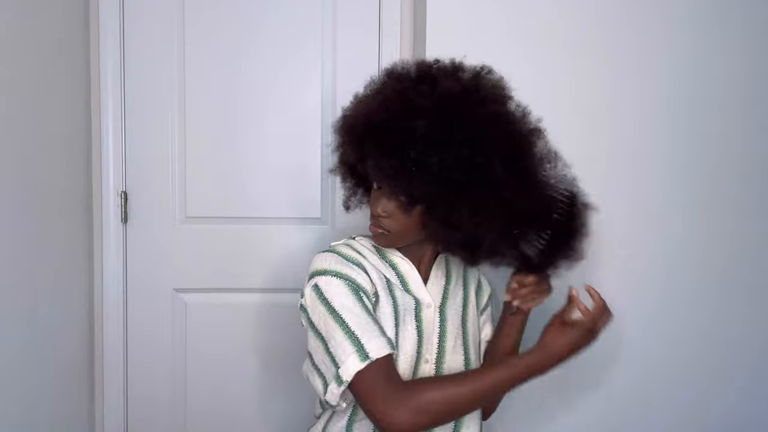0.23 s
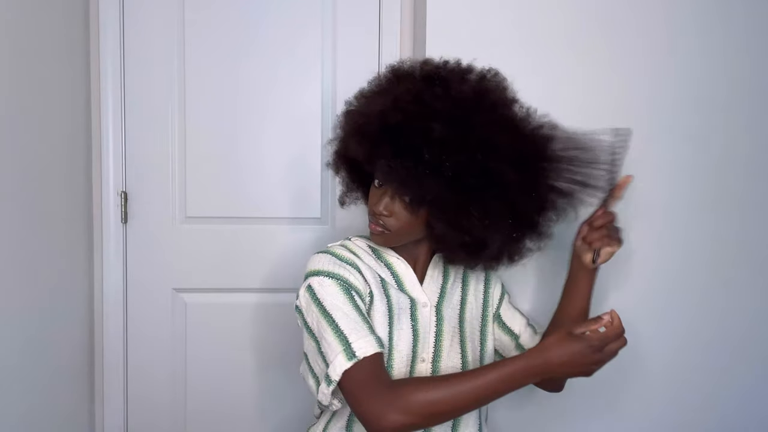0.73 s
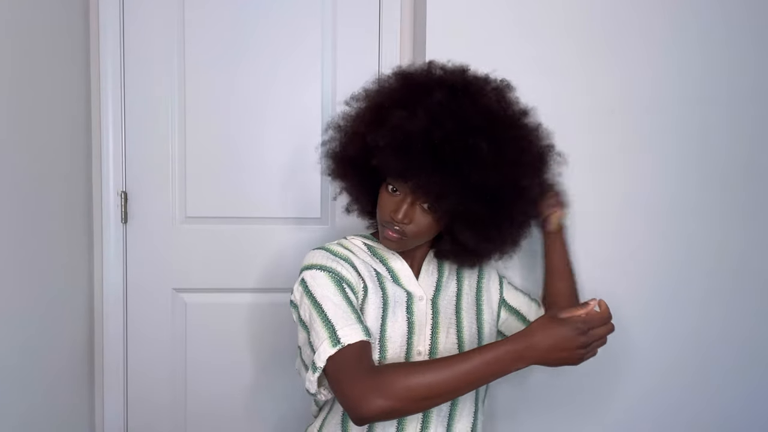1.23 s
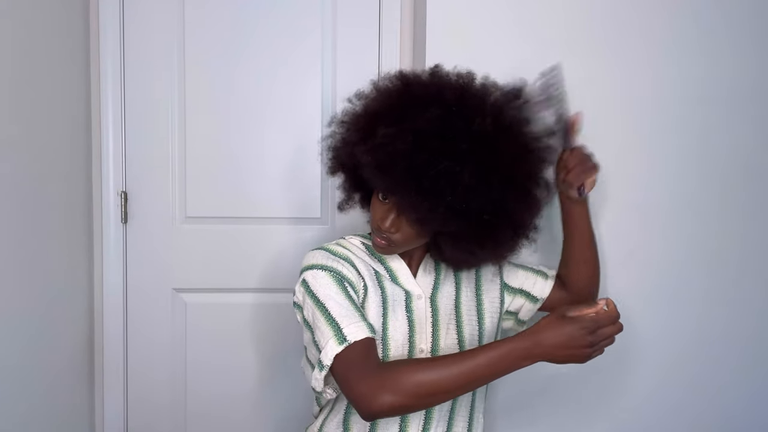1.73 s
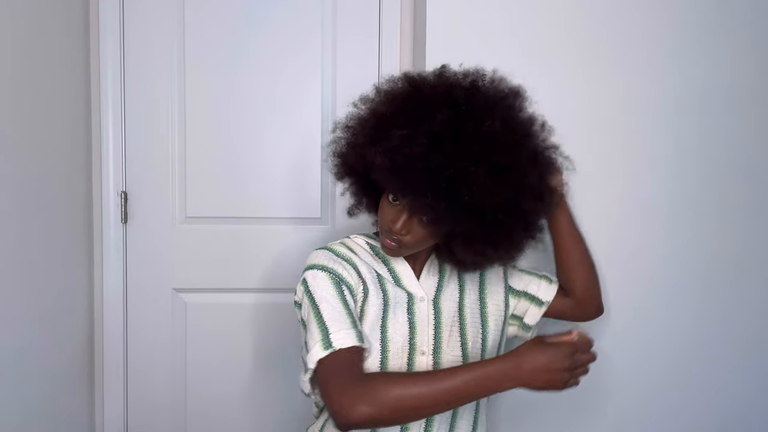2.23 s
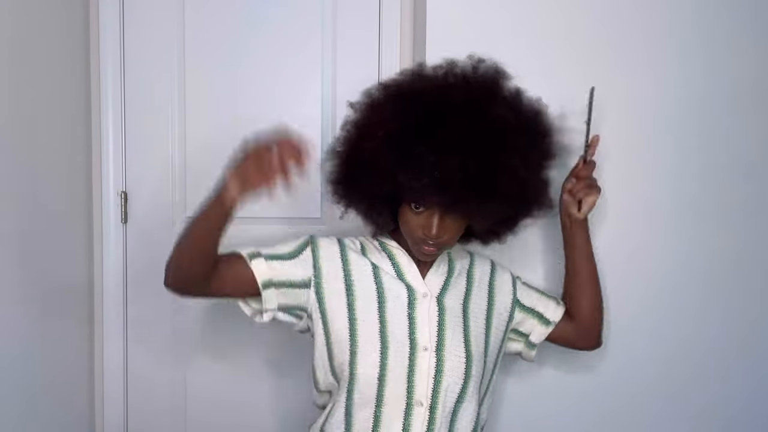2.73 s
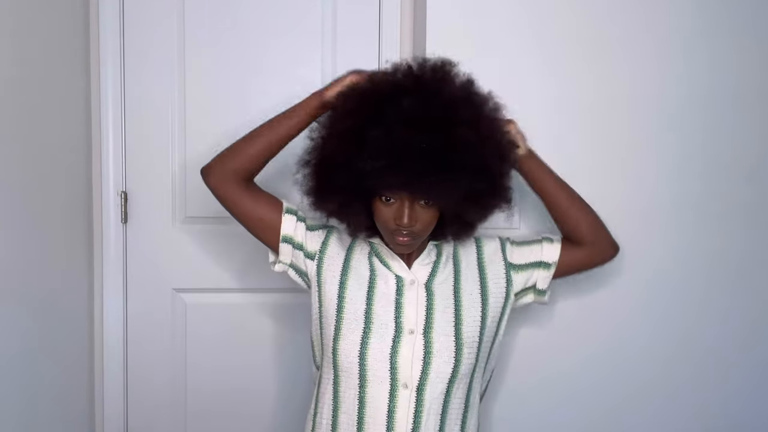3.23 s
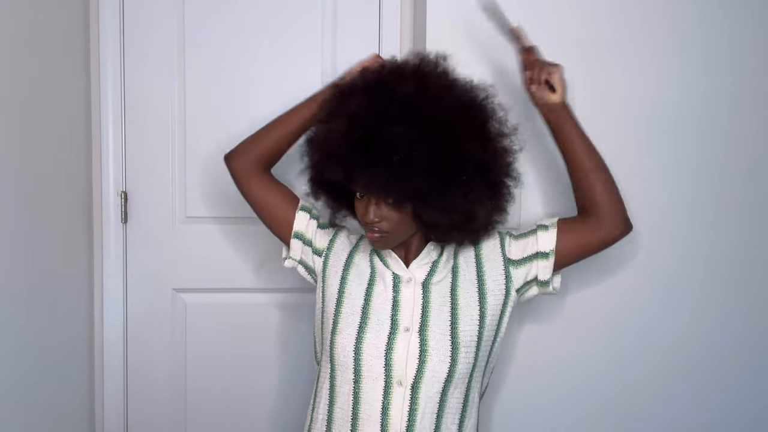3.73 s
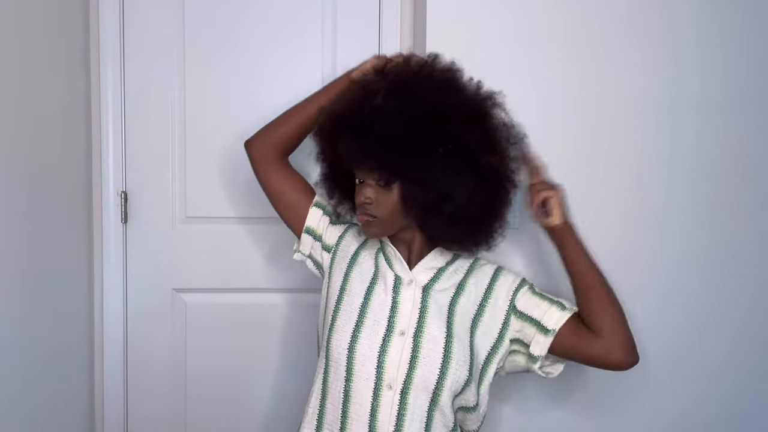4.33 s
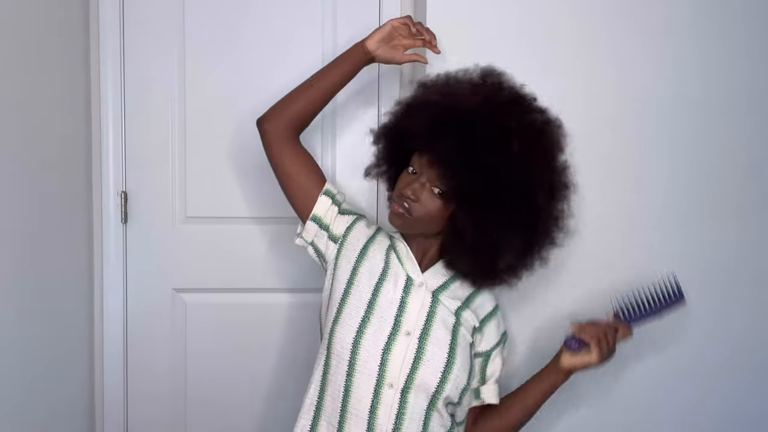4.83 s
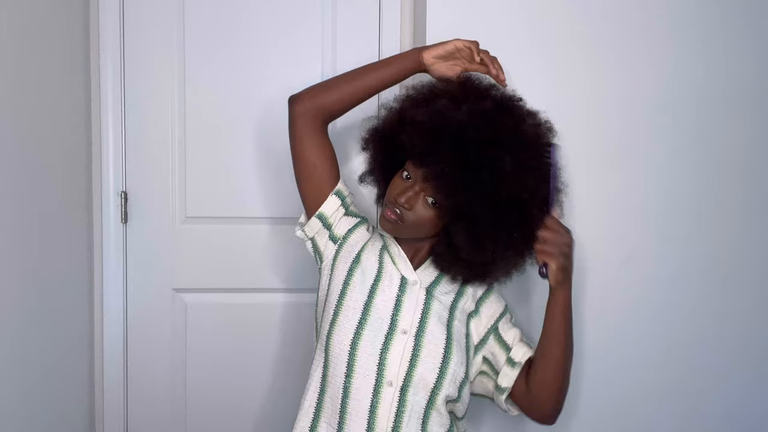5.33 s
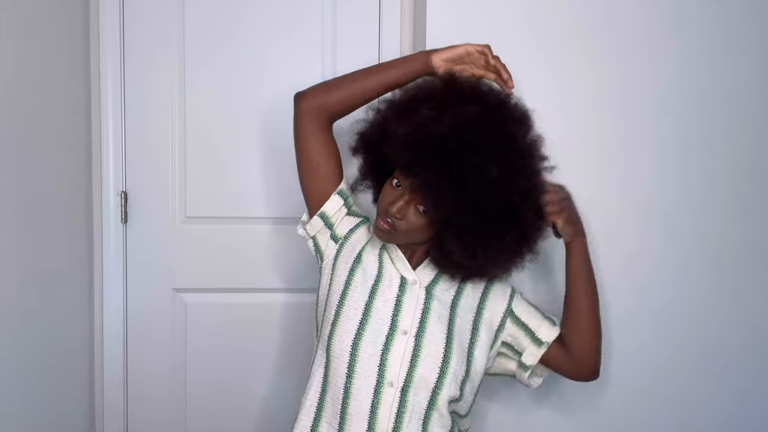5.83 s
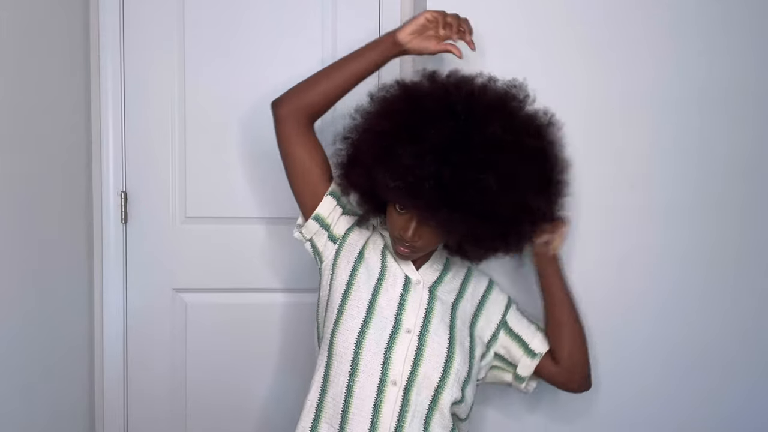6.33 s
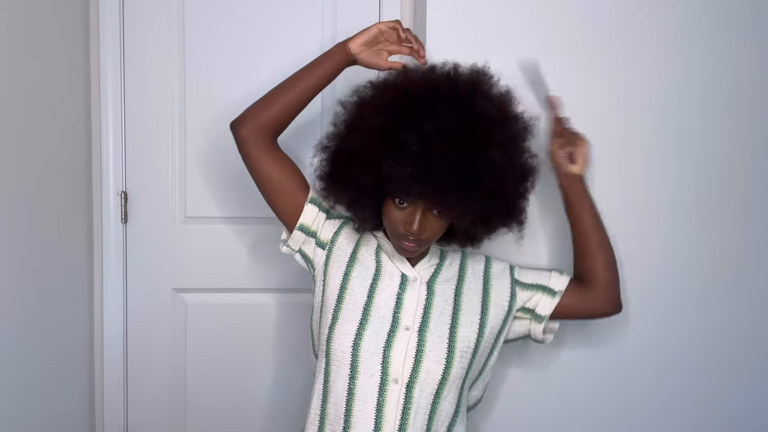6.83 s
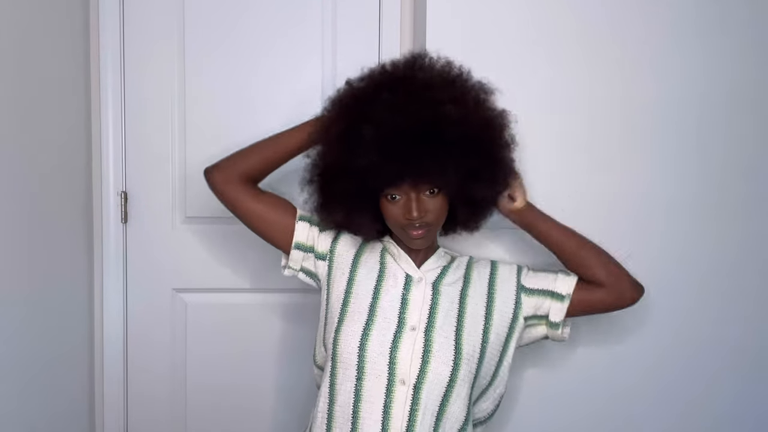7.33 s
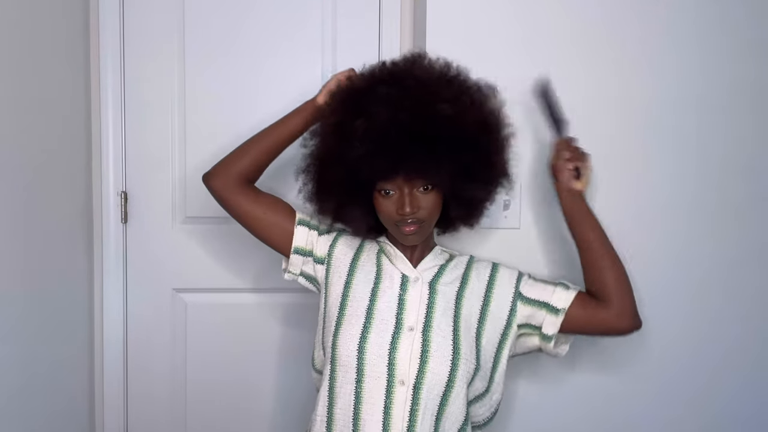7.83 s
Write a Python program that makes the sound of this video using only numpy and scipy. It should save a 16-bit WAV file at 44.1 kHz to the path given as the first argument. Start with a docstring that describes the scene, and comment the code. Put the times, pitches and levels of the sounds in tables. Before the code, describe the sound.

Close stereo microphone in a small bare room: a wide-tooth plastic comb rakes curly hair about three times a second. Each stroke slides in softly, swells to a bright scratchy rasp and stops short, with tangles snapping off the teeth. After about four and a half seconds the hand nearly rests, then firm strokes return. Low building rumble and faint hum lie behind.

```python
"""Close by in a small bare room, a wide-tooth plastic comb rakes a curly wig, heard on a stereo microphone.
From the start a building rumble and appliance hum lie behind it, and a faint far-off whirr fades.
Stroke after stroke, strands slip off the teeth: they hiss, rasp and ring the comb, and tangles snap.
After 4.5 s the hand nearly rests while a far engine and a faint whine come up; firm strokes then resume.
Noise, sparse impulses and sines make the sources; resonances, echoes and a short tail place them."""
import sys
import numpy as np
from scipy import signal
from scipy.fft import rfft, irfft, next_fast_len
from scipy.io import wavfile
from scipy.ndimage import uniform_filter1d, map_coordinates

SR = 44100
rng = np.random.default_rng(int(sys.argv[2]) if len(sys.argv) > 2 else 0)


def dump(signal):
    """Clip the signal to [-1, 1] and save it as 16-bit WAV at the path in sys.argv[1]."""
    limited = np.clip(np.atleast_2d(signal).T, -1, 1)
    pcm = np.round(limited * 32767).astype(np.int16)
    wavfile.write(sys.argv[1], SR, pcm)


N = 355754  # samples, about 8.07 s

# Building rumble, spectrum: hz, relative level_db per Hz
RUMBLE_SPECTRUM = [(20, -38), (30, -12), (40, -2), (50, 4), (59, 7.5), (68, 9), (80, -6.5), (100, -4),
                   (130, -12.5), (200, -72.5)]
# Building rumble as it swells and sinks: time_s, level_db before the overall trim
RUMBLE_SWELL = [(0, -48.5), (.4, -37.5), (.8, -46.5), (1.7, -45.5), (2.15, -47), (2.33, -38), (3, -40),
                (3.3, -45.5), (3.65, -41.5), (3.86, -36.5), (4.1, -41), (4.7, -41), (5.15, -45),
                (6.2, -33.5), (6.7, -40.5), (7.15, -42.5), (7.42, -38.5), (8.07, -47)]
# Deepest rumble, spectrum: hz, relative level_db per Hz
DEEP_SPECTRUM = [(18, -42.5), (30, -8.5), (40, 13), (52, 7.5), (90, -62.5)]
# Deepest rumble in a few long swells: time_s, level_db before the left-right balance
DEEP_SWELL = [(0, -57), (.4, -50.5), (1.7, -55.5), (2.55, -48), (3.6, -61), (3.86, -39), (4.75, -42.5),
              (5.1, -60.5), (6.15, -45), (6.7, -59.5)]
# Steady room air, spectrum: hz, relative level_db per Hz
AIR_SPECTRUM = [(40, -18), (100, 1), (150, 1.5), (200, -5), (260, -9.5), (340, -9), (420, -19), (520, -20),
                (750, -32), (1200, -39.5), (2500, -41.5), (4500, -47), (6000, -45.5), (7500, -55),
                (15000, -71.5)]
# Diffuse sound at the two ports: hz, left_right_likeness (1 alike, -1 opposite)
PORT_LIKENESS = [(60, 1), (125, 0.7), (300, 0.7), (550, -0.39), (1000, 0.22), (8000, -0.9)]
# Appliance hum, lower then upper tone: pitch_hz, mean level_db, left_minus_right_db
HUM_TONES = [(58.2, -51.5, 1), (316.2, -65, 7)]
# Upper hum tone waxing and waning: time_s, added level_db
UPPER_HUM_SWELL = [(0, 0.5), (3, 2), (3.7, -4.5), (4.55, 4.5), (4.9, -4.5), (6, 4), (7.55, 3), (8.07, -5)]
# Far engine: time_s, second_order_db, third_order_db (before trim and left-right balance)
ENGINE_ORDERS = [(0, -95.5, -92.5), (5.2, -65.5, -73), (5.8, -51.5, -62), (6.2, -51, -67.5),
                 (6.6, -59, -68), (6.9, -50, -55), (7.3, -59, -65), (7.75, -44.5, -52.5),
                 (8.07, -53.5, -58)]
# Far engine's firing rate: time_s, mean rate_hz
ENGINE_FIRING = [(5.8, 76.66), (6.95, 77.1), (7.6, 76.35), (8.07, 72.95)]
# Faint whine that comes and goes: time_s, level_db
WHINE_LEVEL = [(5.1, -87), (5.5, -65), (5.95, -65.5), (6.25, -75), (6.55, -57), (7.0, -61.5), (7.3, -84),
               (7.7, -61), (8.07, -74.5)]
WHINE_HZ, WHINE_SAG_HZ_PER_S = 351, 4.8  # mean pitch at first, and its steady fall
# Faint, hollow far-off whirr: time_s, mean level_db
WHIRR_LEVEL = [(1.2, -75), (8.07, -90.5)]

# Strokes: teeth slide in lightly, then pull through the hair and come free.
# Columns: full_pull_s, rise_s, hold_s, pull_db, slide_in_lead_s, slide_in_db,
# rasp_centre_hz, rasp_width_hz, relative rasp_db, relative comb_ring_db
COMB_STROKES = [(0.279, 0.23, 0.0018, -60.5, 0.17, -67.5, 2460, 1200, -2.5, -7),
                (0.36, 0.1, 0.015, -58.5, 0.0, -82, 3700, 1100, 1, 1.5),
                (0.725, 0.11, 0.021, -56, 0.024, -87, 4050, 2000, 4.5, 7),
                (1.06, 0.066, 0.011, -52.5, 0.15, -79, 4100, 900, 0.5, 0.5),
                (1.412, 0.1, 0.016, -56, 0.17, -75, 4560, 1500, 1.5, -1),
                (1.723, 0.071, 0.016, -54, 0.124, -71.5, 4700, 1390, 0.5, -4.5),
                (2.053, 0.089, 0.0079, -50.5, 0.14, -71, 4550, 800, 2, 1.5),
                (2.366, 0.11, 0.0075, -53.5, 0.12, -73.5, 4660, 800, 5, 0),
                (2.682, 0.069, 0.027, -52, 0.26, -75, 4880, 600, -1.5, -5.5),
                (3.006, 0.069, 0.027, -53, 0.21, -74.5, 4860, 1100, 0.5, -3.5),
                (3.352, 0.046, 0.029, -54.5, 0.17, -79, 4230, 750, 3.5, 1),
                (3.701, 0.076, 0.058, -51, 0.05, -78, 5400, 603, 1.5, -4.5),
                (4.144, 0.11, 0.068, -53, 0.11, -81, 4540, 800, -1.5, -8),
                (4.41, 0.011, 0.021, -57, 0.017, -67.5, 4500, 1200, 0.5, -0.5),
                (4.484, 0.052, 0.049, -49, 0.0, -81, 4300, 1200, -1, -3),
                (5.453, 0.07, 0.05, -71, 0.12, -75, 4470, 2000, -16, 0.5),
                (5.577, 0.023, 0.012, -66, 0, -76, 3370, 2000, -22, 2.5),
                (5.899, 0.025, 0.02, -53.5, 0.11, -76, 3280, 3000, -13, 2),
                (6.383, 0.066, 0.025, -55, 0.019, -86, 5030, 1390, 1, 0),
                (6.706, 0.028, 0.067, -50, 0.072, -78, 5300, 1800, -3.5, 8),
                (7.026, 0.044, 0.025, -52, 0.15, -71, 5270, 1100, -2.5, -5),
                (7.409, 0.038, 0.049, -53, 0.11, -81.5, 4970, 1200, 0, -0.5),
                (7.794, 0.064, 0.041, -52, 0.04, -64.5, 5000, 4489, -5, 0.5)]
RISE_DB = 21  # a pull grows by this much in its rise time
ENTER_DB_PER_S, RELEASE_DB_PER_S = 430, 270  # the teeth meet the hair; the last strands let go
REST_DB = -77.5  # hiss as the hair stirs under the other hand, before the hiss trim
# Hiss of slipping strands and tearing tangles: hz, relative level_db per Hz
STRAND_SPECTRUM = [(200, -3), (500, -3.5), (900, -10), (1400, -17), (2500, -18), (4000, -5.5), (6000, -4.5),
                   (8000, 2), (13000, 4), (15500, -3)]
# Resonances of the teeth, damped by the hair: pitch_hz, width_hz, relative level_db
TOOTH_MODES = [(2420, 240, -5), (2860, 58, 7), (3138, 73, 6), (3534, 150, 2.5), (4010, 380, 3.5),
               (4580, 540, -2), (5320, 700, -4)]
# Free ringing of the comb: pitch_hz, width_hz, relative level_db
COMB_MODES = [(6770, 130, -1.5), (6970, 56, -10), (12310, 350, -7.5)]
CATCH_PER_S, CATCH_DB = 150, -4  # single curls catching on a tooth; level relative to the finer slips
RASP_CUT = 0.41  # the teeth radiate little below this share of the rasp's centre
WANDER_OCTAVES, WANDER_PER_S = 0.065, 16  # rasp pitch shifts as the hair rides up and down the teeth

# Tangles that snap free of a tooth: time_s, peak_db before the part levels, tooth_pitch_hz,
# pitch_spread_octaves (either way), knock_db (relative to the peak)
TANGLE_SNAPS = [(0.2802, -48.5, 2500, 0.17, 0), (0.358, -44.5, 3670, 0.39, -10),
                (0.7076, -31.5, 4110, 0.56, 1), (1.05, -44, 4500, 0.15, -1), (1.061, -32, 4180, 0.13, -2),
                (2.053, -36.5, 4450, 0.18, -4), (2.6998, -40, 4910, 0.37, 2), (2.991, -44, 4660, 0.26, -3),
                (2.9997, -40, 4100, 0.4, 5), (3.019, -37.5, 4100, 0.18, 0), (3.7167, -23, 4630, 0.26, -6.5),
                (3.7284, -35.5, 5340, 0.3, -3), (4.1854, -35, 3920, 0.34, 3), (4.412, -42, 4300, 0.33, -5),
                (4.5302, -35, 4430, 0.4, 0), (5.59, -56, 6100, 0.33, -6), (5.929, -46, 3070, 0.47, -5),
                (6.4195, -43, 4100, 0.66, 7), (6.705, -31, 4100, 0.39, -1),
                (6.7469, -25.5, 4840, 0.093, -1), (6.7472, -31, 3160, 0.06, -12),
                (6.7776, -38, 6700, 0.11, -4), (7.816, -31.5, 4160, 0.57, -4), (7.8297, -34, 4210, 0.49, 4)]
TOOTH_GAP_S = 0.0005535  # between neighbouring teeth as a tangle tears
# Knock modes of the whole comb's spine: pitch_hz, width_hz, relative level_db
SPINE_MODES = [(903, 130, -4.5), (1650, 280, -11.5)]
# Light knocks of the spine against the hand: time_s, impulse level_db
SPINE_TAPS = [(3.2647, -28), (5.604, -29)]

# Decay of the small room: hz, time_to_fall_60_db_s
ROOM_DECAY = [(300, 0.41), (2000, 0.02), (3500, 0.38), (5200, 0.47), (7000, 0.34), (9000, 0.13),
              (15000, 0.06)]
# Strength of the diffuse tail: hz, room_over_direct_db
ROOM_LEVEL = [(500, 8), (2500, 2), (5000, -6), (7000, -3), (9000, -6.5), (10500, -43.5), (14500, -4)]
# Door and wall just behind the head: span of their echoes, level, upper edge
NEAR_WALL_S, NEAR_WALL_DB, NEAR_WALL_HZ = 0.013, -3.5, 6540
SNAG_ROOM_DB = -2  # tangles let go at the outer edge of the hair, in plain sight, and so sound drier
# Balance of the microphone ports: hz, left_minus_right_db
PORT_BALANCE = [(2000, -0.5), (3000, 4), (4000, 0.5), (4850, 10.5), (6000, 0), (7200, -3), (10000, -2)]
# Phase of the direct sound: hz, left_port_lag_radians
PORT_LAG = [(2500, 0.1), (4400, 0.8), (5300, 2.1), (6200, 1.76), (8500, 2.05), (9900, 2.905), (11700, 3.23),
            (15700, 5.63)]
TOP_HZ = 15780  # the microphone's band limit

SIDES = np.array([[.5], [-.5]])  # shares a left-minus-right value between left and right


def amp(db):
    """Decibels to gain."""
    return 10 ** (np.asarray(db) / 20)


def unit(x):
    """Scale to rms 1."""
    return x / np.sqrt(np.mean(x ** 2) + 1e-20)


def along(points, hz):
    """Read (Hz, value) points on a log frequency axis."""
    f, v = np.transpose(points)
    return np.interp(np.log(hz + 1), np.log(f + 1), v)


def curves(rows):
    """One value per sample for each column after the time."""
    s, *cols = np.transpose(rows)
    return [np.interp(np.arange(N) / SR, s, c) for c in cols]


def wobble(rate):
    """A smooth random curve with this many knots a second."""
    knots = rng.standard_normal(int(N * rate / SR) + 4)
    return map_coordinates(knots, [np.arange(N) * rate / SR])


def filtered(x, response):
    """Multiply the spectrum of x by a complex response of frequency."""
    size = next_fast_len(N + SR // 2, True)
    hz = np.fft.rfftfreq(size, 1 / SR)
    return irfft(rfft(x, size) * response(hz), size)[..., :N]


def ringing(x, modes):
    """Excite a set of parallel resonances with x."""
    def response(f):
        return sum(amp(db) * 1j * f * w / (c * c - f * f + 1j * f * w) for c, w, db in modes)
    return filtered(x, response)


def tone(hz):
    """A sine of rms 1 that follows a pitch curve."""
    cycles = np.cumsum(hz) / SR + rng.random()
    return np.sqrt(2) * np.sin(2 * np.pi * cycles)


def wash(spectrum):
    """Diffuse stereo noise of rms 1, nearly alike at both ports in the deepest bass."""
    def response(hz):
        turn = np.arccos(np.clip(along(PORT_LIKENESS, hz), -1, 1)) / 2
        return amp(along(spectrum, hz)) * np.array([np.cos(turn), np.sin(turn)])
    mid, side = filtered(rng.standard_normal((2, N)), response)
    return unit(np.array([mid + side, mid - side]))


def rumble(db, pan_db):
    """The building's low rumble is shaped noise evened out, then swelled, with deeper swells beneath."""
    noise = wash(RUMBLE_SPECTRUM)
    power = uniform_filter1d(np.mean(noise ** 2, axis=0), size=SR // 8)
    even = noise / np.sqrt(np.abs(power))
    deep = amp(curves(DEEP_SWELL)[0]) * wash(DEEP_SPECTRUM)
    return (amp(curves(RUMBLE_SWELL)[0] + db) * even + deep) * amp(pan_db * SIDES)


def room_air(level_db):
    """Steady air is diffuse shaped noise with a slight waver in level."""
    return amp(level_db + 0.2 * wobble(7.7)) * wash(AIR_SPECTRUM)


def appliance_hum():
    """Two sines waver in pitch and level; the upper one also waxes and wanes."""
    tones = []
    for hz, db, pan_db in HUM_TONES:
        level = amp(db + pan_db * SIDES + 1.2 * wobble(1.504))
        tones.append(level * tone(hz + 0.45 * wobble(3.97)))
    lower, upper = tones
    return lower + amp(curves(UPPER_HUM_SWELL)[0]) * upper


def far_engine(pan_db):
    """The far engine drones at twice and three times its wavering firing rate, stronger on the right."""
    firing_hz = curves(ENGINE_FIRING)[0] + 0.4 * wobble(7)
    drone = np.zeros(N)
    for order, db in enumerate(curves(ENGINE_ORDERS), 2):
        drone += amp(db - 0.5 + 1.1 * wobble(6.5)) * tone(order * firing_hz)
    return drone * amp([[-pan_db], [pan_db]])


def whine():
    """A faint sine comes and goes as its slightly wavering pitch sinks."""
    elapsed = np.maximum(np.arange(N) / SR - WHINE_LEVEL[0][0], 0)
    hz = WHINE_HZ - WHINE_SAG_HZ_PER_S * elapsed
    return amp(curves(WHINE_LEVEL)[0]) * tone(hz + 1.1 * wobble(10))


def whirr(hz):
    """Independent noise at each port excites one resonance, hollow and far off."""
    hollow = unit(ringing(rng.standard_normal((2, N)), [(hz, 70, 0)]))
    return amp(curves(WHIRR_LEVEL)[0] + 0.59 * wobble(22.0)) * hollow


def background(air_db, whirr_hz, engine_pan_db):
    """Steady air, the hum, a far engine, and a faint whine and whirr add together."""
    return room_air(air_db) + appliance_hum() + far_engine(engine_pan_db) + whine() + whirr(whirr_hz)


def reflections(count):
    """The room answers one place of the comb with a few near echoes and a short diffuse tail."""
    hz, t, z = signal.stft(rng.standard_normal((2, SR // 2)), SR, nperseg=256)
    decay = amp(-60 * t / along(ROOM_DECAY, hz)[:, None])
    energy = np.sum(decay ** 2, axis=1, keepdims=True) * t[1] * SR
    decay *= amp(along(ROOM_LEVEL, hz))[:, None] / np.sqrt(energy)
    tail = signal.istft(z * decay, SR, nperseg=256)[1]
    echoes = np.zeros_like(tail)
    delays = (rng.random((2, count)) * NEAR_WALL_S * SR).astype(int)
    signs = rng.choice([-1, 1], (2, count))
    np.put_along_axis(echoes, delays, signs / np.sqrt(count), axis=1)
    dull = signal.butter(6, NEAR_WALL_HZ, fs=SR, output='sos')
    return tail + amp(NEAR_WALL_DB) * signal.sosfilt(dull, echoes)


def room(x, to_walls):
    """Direct sound reaches the right port first; walls answer anew each stroke, as the comb moves."""
    pulls = np.array([row[0] for row in COMB_STROKES])
    edges = np.r_[0, (pulls[1:] + pulls[:-1]) / 2 * SR, N].astype(int)
    walls = np.zeros((2, N + SR))
    for start, end in zip(edges, edges[1:]):
        answer = signal.fftconvolve(to_walls[None, start:end], reflections(count=14), axes=1)
        late = start + SR // 500  # the answer begins 2 ms after the direct sound
        walls[:, late:][:, :answer.shape[1]] += answer
    direct = filtered(x, lambda f: np.exp(-1j * SIDES * along(PORT_LAG, f)))
    return filtered(direct + walls[:, :N], lambda f: amp(SIDES * along(PORT_BALANCE, f)))


def taps():
    """Impulses ring the spine's modes as dull knocks, with no tearing hair."""
    knocks = np.zeros(N)
    for s, db in SPINE_TAPS:
        knocks[round(s * SR)] = amp(db)
    return ringing(knocks, SPINE_MODES)


def snags(crack_db, tooth_db, ring_db, knock_db, scatter, t60, tooth_t60, count):
    """A tangle tears with a crack; the teeth that held it spring back in turn and jolt the comb."""
    t = np.arange(SR // 20) / SR
    tears, flicks, jolts, knocks = np.zeros((4, N + SR))
    for s, db, tooth_hz, spread, thud_db in TANGLE_SNAPS:
        at = round(s * SR)
        octaves = spread * rng.permutation(np.linspace(-1, 1, count))
        octaves += scatter * rng.standard_normal(count)
        hz = tooth_hz * 2 ** octaves[:, None]
        # time since each tooth sprang free
        free = np.maximum(t - TOOTH_GAP_S * np.arange(count)[:, None], 0)
        tears[at:][:len(t)] += amp(db - 60 * t / t60) * rng.choice([-1, 1], len(t))
        envelope = amp(db - 60 * free / tooth_t60) * (1 - np.exp(-free / 0.0011))
        flicks[at:][:len(t)] += np.sum(envelope * np.sin(2 * np.pi * hz * free), axis=0)
        jolts[at] = amp(db)
        knocks[at] = amp(db + thud_db)
    crack = amp(crack_db) * filtered(tears[:N], lambda hz: amp(along(STRAND_SPECTRUM, hz)))
    ring = amp(ring_db) * ringing(jolts[:N], COMB_MODES)
    knock = amp(knock_db) * ringing(knocks[:N], SPINE_MODES)
    return crack + amp(tooth_db) * flicks[:N] + ring + knock


def drag(uneven_db):
    """Comb drag in dB: each stroke slides in lightly, builds to a pull, holds and lets go, unevenly."""
    t = np.arange(N) / SR
    power = np.full(N, 1e-12)  # keeps the logarithm finite
    for s, rise, hold, pull_db, lead, slide_db, *_ in COMB_STROKES:
        near = slice(max(int((s - .5) * SR), 0), int((s + .5) * SR))
        u = t[near] - s  # time from the full pull
        release = RELEASE_DB_PER_S * np.maximum(u - hold, 0)
        slide = slide_db + ENTER_DB_PER_S * np.minimum(u + lead, 0)
        pull = pull_db + RISE_DB * np.minimum(u, 0) / rise
        power[near] += amp(slide - release) ** 2 + amp(pull - release) ** 2
    return 10 * np.log10(power) + uneven_db * wobble(70)


def slips(rate, clump_db):
    """Single strands slip as tiny random impulses, their strength varying in clumps by clump_db."""
    happen = rng.random(N) < rate / SR
    return unit(happen * rng.standard_normal(N) * amp(clump_db * wobble(300)))


def rasp(friction):
    """Gripped teeth ring in a band that glides with the depth at which the hair holds them."""
    out = np.zeros(N)
    pulls = np.r_[0, [row[0] * SR for row in COMB_STROKES], N].astype(int)
    *_, centre_hz, _, level_db, _ = curves(COMB_STROKES)
    wandering_hz = centre_hz * 2 ** (WANDER_OCTAVES * wobble(WANDER_PER_S))
    turn = np.exp(2j * np.pi * np.cumsum(wandering_hz) / SR)
    # each stroke's band fades in from the stroke before and out to the one after
    shares = np.eye(len(COMB_STROKES))
    for stroke, share, start, end in zip(COMB_STROKES, shares, pulls, pulls[2:]):
        *_, hz, width_hz, _, _ = stroke
        near = np.arange(start, end)
        # shift the gliding centre to zero, smooth to the band's width, and shift back
        pole = np.exp(-np.pi * abs(width_hz) / SR)
        band = signal.lfilter([1], [1, -pole], friction[near] / turn[near]) * turn[near]
        low_cut = signal.butter(4, RASP_CUT * hz, 'high', fs=SR, output='sos')
        fade = np.interp(near, pulls[1:-1], share)
        out[near] += fade * unit(signal.sosfilt(low_cut, band.real))
    return amp(level_db) * out


def combing(hiss_db, rasp_db, ring_db, bite, ring_bite, firm_db):
    """Slipping strands hiss, make the teeth rasp and ring the comb; whole curls catch now and then."""
    drag_db = drag(uneven_db=1.93)
    free_db = curves(COMB_STROKES)[-1]
    catch_happens = rng.random(N) < CATCH_PER_S / SR
    catches = amp(CATCH_DB) * unit(catch_happens * rng.choice([-1, 1], N))
    fine = slips(rate=14000, clump_db=0.0) + amp(-7.5) * catches
    coarse = slips(rate=4000, clump_db=-0.8) + catches
    hiss = amp(hiss_db) * unit(filtered(fine, lambda hz: amp(along(STRAND_SPECTRUM, hz))))
    # a light touch mostly hisses: the teeth bend, rasp and ring under a firm pull
    firmness_db = drag_db - firm_db
    ring = amp(ring_db + free_db + ring_bite * firmness_db) * unit(ringing(fine, COMB_MODES))
    teeth = amp(rasp_db + bite * firmness_db) * rasp(ringing(coarse, TOOTH_MODES))
    return np.hypot(amp(drag_db), amp(REST_DB)) * hiss + amp(drag_db) * (ring + teeth)


def scene():
    """The comb, close by in the room, sounds over the background."""
    low = rumble(db=-1.9, pan_db=0.9)
    behind = background(air_db=-50.0, whirr_hz=732, engine_pan_db=4.0)
    snaps = snags(crack_db=-9.5, tooth_db=-5.0, ring_db=23.0, knock_db=13.5,
                  scatter=0.055, t60=0.017, tooth_t60=0.0082, count=5)  # octaves, s, s, teeth
    snaps = snaps + taps()
    strokes = combing(hiss_db=0.02, rasp_db=-2.0, ring_db=-0.5, bite=0.42, ring_bite=0.19, firm_db=-44.5)
    comb = room(strokes + snaps, to_walls=strokes + amp(SNAG_ROOM_DB) * snaps)
    return comb + low + behind


def record(dry):
    """The microphone keeps nothing above its band limit."""
    return filtered(dry, lambda hz: hz < TOP_HZ)


dry = scene()
out = record(dry)
dump(out)
```